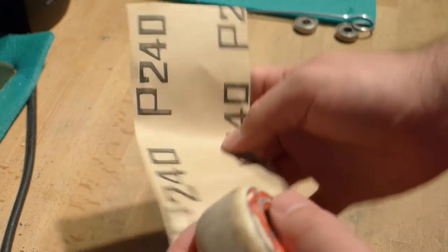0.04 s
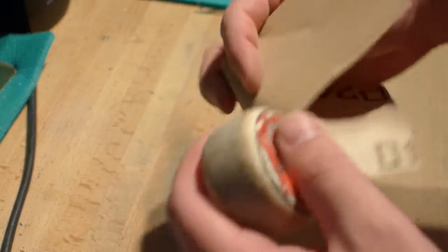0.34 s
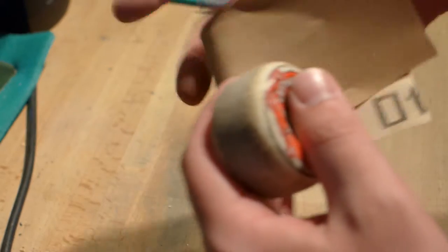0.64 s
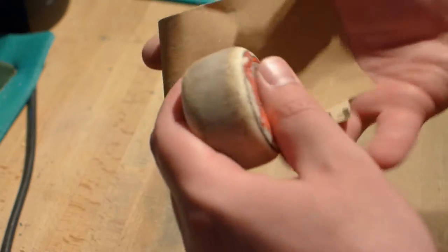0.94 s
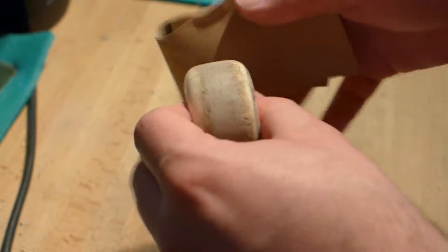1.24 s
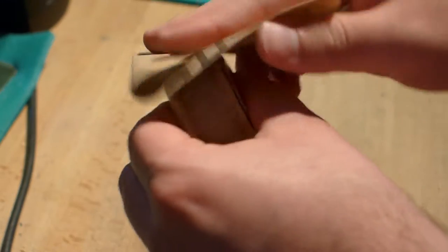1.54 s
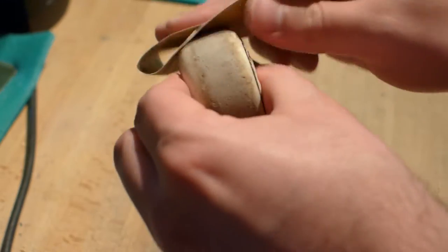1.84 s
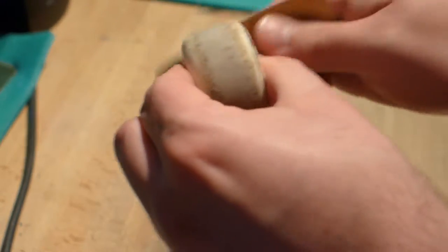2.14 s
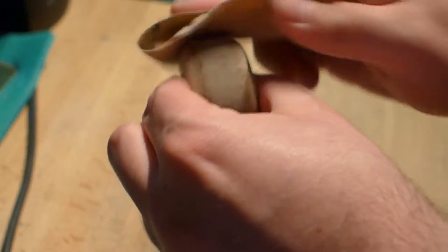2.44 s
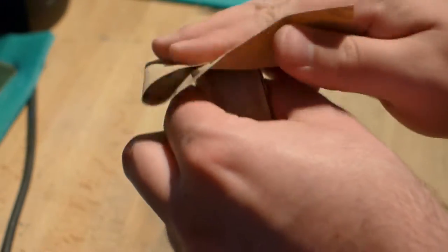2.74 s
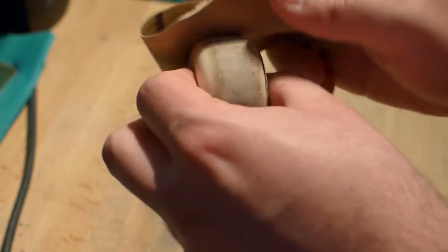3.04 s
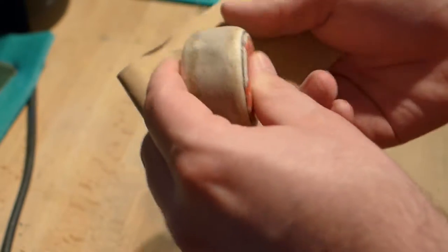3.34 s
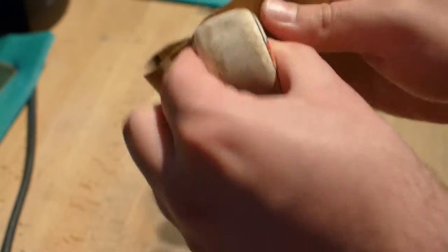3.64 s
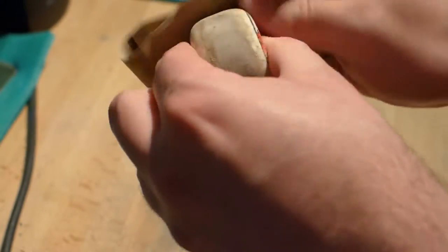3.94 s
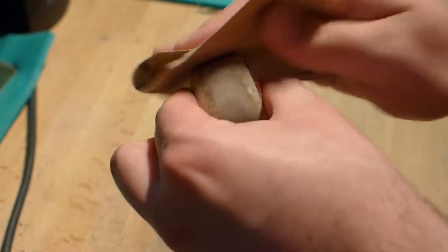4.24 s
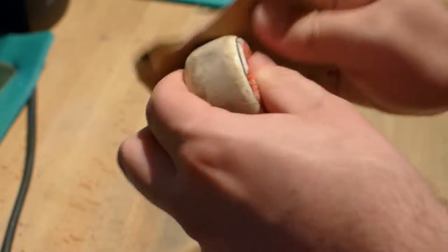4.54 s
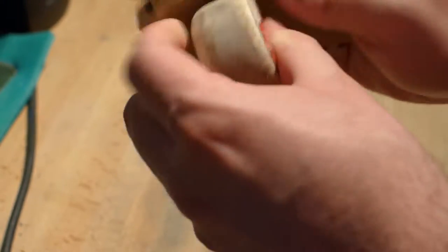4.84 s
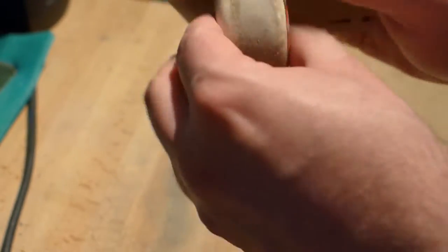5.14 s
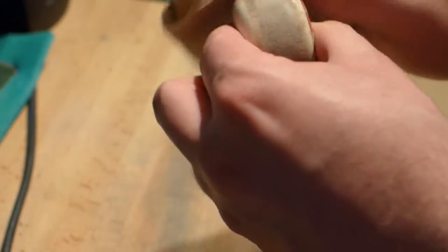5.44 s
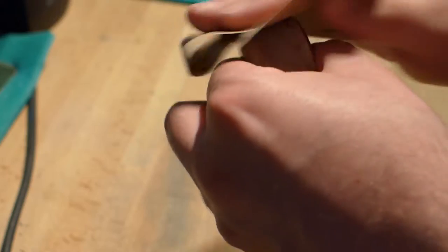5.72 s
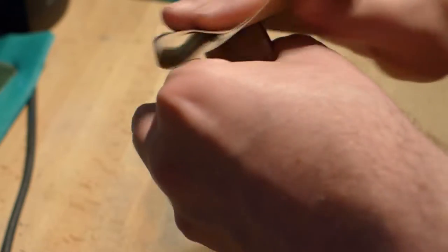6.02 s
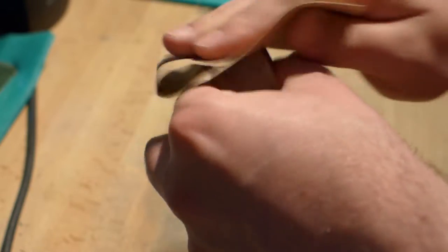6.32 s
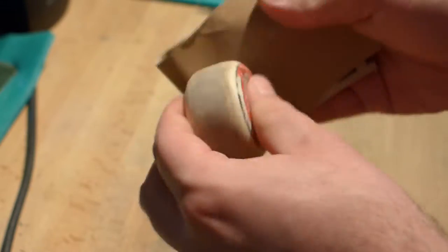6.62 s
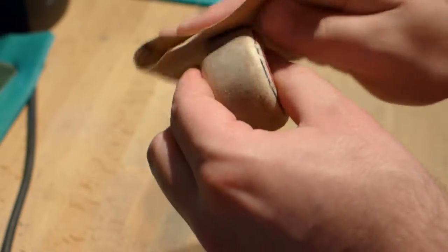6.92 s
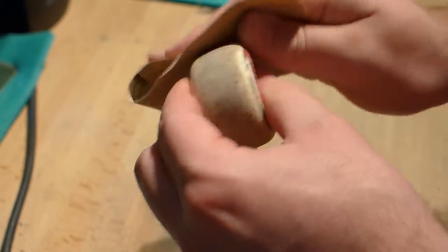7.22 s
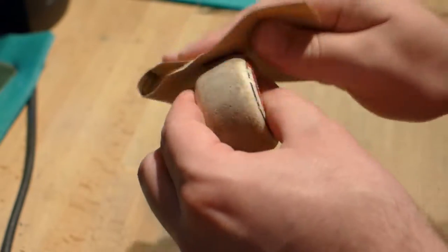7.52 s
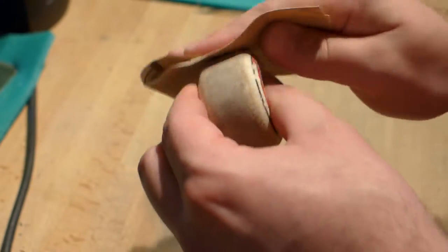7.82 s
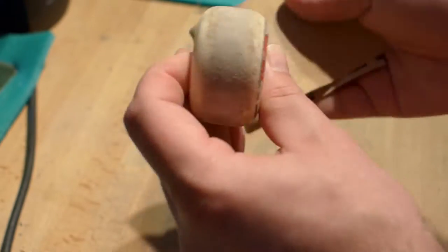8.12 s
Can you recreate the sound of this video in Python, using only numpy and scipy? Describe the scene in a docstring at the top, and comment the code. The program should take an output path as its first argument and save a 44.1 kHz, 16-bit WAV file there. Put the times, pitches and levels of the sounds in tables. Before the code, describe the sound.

A sheet of sandpaper rustles and cracks as fingers fold it. It then rasps against a skateboard wheel in separate, uneven strokes, with sharp little ticks of catching grit and a few soft finger bumps. The strokes speed up into fast, hissing back-and-forth scrubbing, break off briefly, then resume and stop. Everything is heard close up in a small, dry workshop.

```python
"""Sandpaper rubs a urethane skateboard wheel: long strokes, then scrubbing at about twenty strokes a
second, with pauses to turn the wheel. The grit hisses and drives the resonances of the folded sheet.
The sheet is folded by hand first, rustling and buckling; later, grit catches and fingers bump the wheel.
Heard close, above a wooden bench in a small, dry workshop."""
import sys
import numpy as np
from scipy import signal
from scipy.fft import rfft, irfft, next_fast_len
from scipy.io import wavfile
from scipy.ndimage import uniform_filter1d, map_coordinates

SR = 44100
rng = np.random.default_rng(int(sys.argv[2]) if len(sys.argv) > 2 else 0)


def transcribe(signal):
    """Save signal, clipped to [-1, 1], as a 16-bit WAV file at the path in sys.argv[1]."""
    frames = np.atleast_2d(signal).T
    limited = np.clip(frames, -1, 1)
    pcm = np.round(limited * 32767).astype(np.int16)
    wavfile.write(sys.argv[1], SR, pcm)


N = 364707

# Spectra of grit hiss, sheet ring and low body: (frequency [Hz], relative gain [dB])
GRIT_SPECTRUM = [(600, -59.5), (1300, -17), (2200, -5), (3500, -4.5), (5000, -0.5), (6000, -1.5), (7400, 1),
                 (9000, 0), (11500, 0), (13500, -2.5), (15500, -12)]
SHEET_SPECTRUM = [(500, -41), (1100, -36.5), (1400, -23), (1900, -11), (2300, -2.5), (3200, 2), (5000, 0),
                  (5900, -7), (9000, -27.5)]
BODY_SPECTRUM = [(50, -34), (130, -25.5), (230, -24.5), (320, -6), (450, -5.5), (640, 2), (800, -2),
                 (1100, 0), (1400, -0.5), (2200, -2), (4000, -25)]
# Modes of the fold, held slack and pressed tight: (centre [Hz], width [Hz], added peak [dB])
SLACK_FOLD_MODES = [(1515, 300, 8), (2190, 320, -1), (2800, 140, -9.5), (3960, 170, -3), (4760, 760, -4)]
TIGHT_FOLD_MODES = [(3010, 500, 0.67), (4120, 230, 0.72), (4820, 640, -0.75)]
# Steady low resonances of bench, room and cupped hand: (centre [Hz], width [Hz], added peak [dB])
LOW_RESONANCES = [(160.6, 20, 9.5), (450, 35, 3), (559, 37, -4), (883, 14, -7), (1336, 26, 4.5),
                  (1670, 230, 2)]
# Finger pressure on the fold: (time [s], tightness [0-1])
FOLD_GRIP = [(1.6, 0.01), (3.1, 0), (3.8, 0.7), (4.1, 0.97), (5.3, 0.97), (5.95, 1), (6.12, 0.05),
             (6.4, 0.9), (6.8, 0.2), (7.05, 0.97), (8.0, 1)]
SPEED_EXPONENT = 1.033  # amplitude ~ hand speed ** exponent


def sanding():
    """Sliding grit hisses and shakes the sheet; grip shifts the modes, stick-slip adds chatter."""
    resting_power = contact() ** 2 / 2
    hiss_power, ring_power = resting_power.copy(), resting_power.copy()
    body_power = resting_power * amp(-12) ** 2
    for start_s, length_s, db, crest, bright_db, body_db in strokes():
        power = (amp(db) * swell(length_s, crest) ** SPEED_EXPONENT) ** 2
        hiss_share = 1 / (1 + amp(-2 * bright_db))
        add(hiss_power, start_s, power * hiss_share)
        add(ring_power, start_s, power * (1 - hiss_share))
        add(body_power, start_s, power * amp(body_db) ** 2)
    chatter = amp(1.26 * wobble(rate_hz=170) - 0.97)
    grit = flexing(grains(clump_db=1.06, clump_hz=875, spike_db=2.5), depth_db=2.8)
    hiss = amp(-0.06) * coloured(np.sqrt(hiss_power) * grit, GRIT_SPECTRUM)
    scrape = lambda: flexing(grains(clump_db=2.3, clump_hz=699, spike_db=3.5), depth_db=4.0)
    grip = np.clip(curve(FOLD_GRIP), 0, 1)
    tight = coloured(np.sqrt(ring_power * grip) * scrape(), SHEET_SPECTRUM, TIGHT_FOLD_MODES)
    slack = coloured(np.sqrt(ring_power * (1 - grip)) * scrape(), SHEET_SPECTRUM, SLACK_FOLD_MODES)
    coarse = flexing(grains(clump_db=4.5, clump_hz=197.4, spike_db=4), depth_db=5.0)
    body = amp(3.5) * coloured(np.sqrt(body_power) * coarse, BODY_SPECTRUM, LOW_RESONANCES)
    return chatter * (hiss + amp(-0.84) * (tight + slack) + body)


# Single strokes: (start [s], length [s], relative level [dB], speed crest [0-1], brightness [dB],
# body send [dB])
SINGLE_STROKES = [(1.561, 0.095, -17, 0.4, -1, -18.5), (1.703, .1, -17, 0.29, 0.5, -23),
                  (1.81, 0.041, -25.5, 0.8, -2, -22), (1.855, 0.14, -20.5, 0, -1.5, -21),
                  (1.968, 0.08, -19, .55, 4, -24.5), (2.062, .078, -17, 0.36, 2.5, -21),
                  (2.193, .13, -17, .34, .5, -25.5), (2.351, 0.08, -20.5, 0.68, 8, -30.5),
                  (2.455, 0.14, -17.5, 0.06, 1.5, -25), (2.623, 0.085, -16.5, 0.24, 5.5, -27.5),
                  (2.728, 0.086, -18, 0.56, 3.5, -24), (2.831, 0.14, -19, 0.22, 8, -25.5),
                  (3.012, 0.12, -18, 0.61, -1, -28.5), (3.213, 0.15, -30, 0, 3.5, -17),
                  (3.506, 0.1, -22, 0.04, 7.5, -23.5), (3.587, 0.11, -23, 0.18, 4.5, -21.5),
                  (3.695, 0.12, -21, 0.38, 13, -25), (3.815, 0.081, -22, 0.05, 12, -25.5),
                  (3.89, 0.07, -17.5, 0.29, 4.5, -30), (3.959, 0.048, -19, .37, 10, -46),
                  (6.353, 0.074, -18.5, 0.4, -0.5, -27.5), (6.675, 0.08, -26, 0.27, 1.5, -44)]
# Back-and-forth runs: (start [s], end [s], strokes [count], relative level [dB], brightness [dB],
# body send [dB], push over pull [dB], build-up over the run [dB])
SCRUB_RUNS = [(4.012, 4.128, 2, -18.5, 2, -57, -3, -3), (4.13, 4.324, 4, -17.5, 1, -45, -2, 2),
              (4.33, 4.511, 4, -17.5, 2.5, -40, 2.5, 6), (4.516, 4.817, 6, -19.5, 2.5, -51, -1.5, 3.5),
              (4.832, 5.038, 4, -24.5, 3, -34, 1.5, -4.5), (5.035, 5.139, 2, -17.5, 2.5, -41, 0.5, 0.5),
              (5.147, 5.397, 4, -19.5, 3, -40, 0, 6), (5.399, 5.466, 1, -21.5, 2, -36, 0.5, -0.5),
              (5.468, 5.91, 9, -18.5, 1, -34.5, 0.5, 0), (5.912, 6.206, 6, -17.5, 2, -32, 2, 1),
              (6.214, 6.36, 3, -20.5, 1, -33.5, 3, -4), (6.75, 6.878, 3, -19.5, 1, -36, 1.5, -9),
              (6.887, 6.99, 2, -22.5, 2, -25, 0, -4), (6.991, 7.082, 2, -19, -1, -32, -1.5, 6.5),
              (7.088, 7.485, 8, -17.5, 0, -35.5, 1, -0.5), (7.495, 7.775, 6, -18, -1.5, -35.5, 1.5, -1.5),
              (7.782, 7.935, 3, -17, -1, -30.5, -0.5, 1.5), (7.93, 8.014, 2, -17.5, 3.5, -28.5, -8, -10.5)]
SCRUB_CREST, SCRUB_OVERLAP_S, SCRUB_SCATTER_DB = 0.42, 0.0043, 0.47
DULLING_DB_PER_DB = 0.28


def strokes():
    """All hand strokes; in a run, push and pull alternate and harder strokes are louder and duller."""
    rows = list(SINGLE_STROKES)
    for start_s, end_s, count, db, bright_db, body_db, push_db, build_db in SCRUB_RUNS:
        count = round(count)
        length_s = (end_s - start_s) / count
        for k in range(count):
            progress = (k + .5) / count - .5
            press_db = (-1) ** k * push_db / 2 + progress * build_db
            press_db += SCRUB_SCATTER_DB * rng.standard_normal()
            onset_s = start_s + k * length_s - SCRUB_OVERLAP_S / 2
            rows.append((onset_s, length_s + SCRUB_OVERLAP_S, db + press_db,
                         SCRUB_CREST, bright_db - DULLING_DB_PER_DB * press_db, body_db))
    return rows


# Paper lying lightly on the wheel: (landing [s], lift [s], relative level [dB])
LIGHT_CONTACTS = [(1.557, 3.127, -35), (3.145, 3.41, -40.5), (3.436, 6.471, -40.5), (6.661, 8.028, -39.5)]
LIFT_DB_PER_S = 595


def contact():
    """Gain of the light rubbing between strokes: starts on landing, holds, fades as the paper lifts."""
    t = np.arange(N) / SR
    gains = [(t >= land_s) * amp(db - LIFT_DB_PER_S * np.clip(t - lift_s, 0, 1))
             for land_s, lift_s, db in LIGHT_CONTACTS]
    return np.max(gains, axis=0)


# Spectra of paper rustle and sliding skin: (frequency [Hz], relative gain [dB])
RUSTLE_SPECTRUM = [(800, -32.5), (1400, -7), (1800, 0), (2100, 5), (2400, 4.5), (2900, 3.5), (3700, 1.5),
                   (5000, -5), (6500, -44), (12000, -51.5)]
SLIDE_SPECTRUM = [(2500, -38.5), (5000, -3), (7000, -3), (10000, -4), (13000, -7.5), (15500, -19.5)]
# Whisper of the loose sheet in the hand: (time [s], relative level [dB])
WHISPER_LEVELS = [(0, -46.5), (.3, -51), (.45, -47.5), (.76, -45), (.85, -54.5), (.92, -46), (1.55, -45.5),
                  (1.65, -78)]
# Finger rubs: (start [s], length [s], rustle [dB], flutter [dB], hiss [dB], flutter pitch [Hz])
FINGER_RUBS = [(0.026, 0.067, -38, -38, -35.5, 890), (0.094, 0.16, -44, -53, -38, 800),
               (0.188, 0.12, -45, -35.5, -61, 900), (0.356, 0.092, -44, -45, -44.5, 560),
               (0.627, 0.11, -26.5, -40, -31.5, 676), (0.875, .12, -36, -48.5, -47, 447),
               (0.978, 0.07, -37, -35, -32.5, 467), (1.077, 0.057, -36.5, -38, -34, 640),
               (1.103, 0.084, -24, -32, -30.5, 485), (1.17, 0.13, -40.5, -59.5, -42, 330),
               (1.285, 0.037, -36, -60, -33, 400), (1.332, 0.11, -31, -57.5, -30.5, 170),
               (1.489, 0.049, -32.5, -46.5, -33.5, 400), (3.202, 0.18, -48, -48.5, -48, 384),
               (3.506, 0.22, -55.5, -58.5, -48, 330)]
RUB_CREST, RUSTLE_HZ = 0.37, 2400


def folding():
    """Skin slides on the paper, which crackles and flutters at a pitch set by its bend."""
    crackle = lambda: flexing(grains(clump_db=2.5, clump_hz=398, spike_db=4.0), depth_db=4.0)
    slips, flutter, loose = crackle(), crackle(), crackle()
    whisper = coloured(loose, RUSTLE_SPECTRUM)
    whisper += amp(-5.0) * flapping(loose, pitch_hz=440)
    whisper += amp(-1.0) * coloured(loose, SLIDE_SPECTRUM)
    track = amp(curve(WHISPER_LEVELS)) * whisper
    for start_s, length_s, rustle_db, flutter_db, hiss_db, flutter_hz in FINGER_RUBS:
        speed = swell(length_s, RUB_CREST)
        first = max(round(start_s * SR), 0)
        drive = lambda source: speed * unit(source[first:first + len(speed)])
        rustle = coloured(drive(slips), RUSTLE_SPECTRUM, modes=[(RUSTLE_HZ, 300, 0.5)])
        add(track, start_s, amp(rustle_db) * rustle)
        add(track, start_s, amp(flutter_db) * flapping(drive(flutter), flutter_hz))
        add(track, start_s, amp(hiss_db) * coloured(drive(slips), SLIDE_SPECTRUM))
    return track


# Paper panel response: (frequency [multiple of pitch], relative gain [dB])
PANEL_SPECTRUM = [(.1, -36), (.3, -21), (.6, -7), (1, 5), (1.5, -3.5), (2.3, -3.5), (3, -10), (6, -42)]


def flapping(x, pitch_hz):
    """A panel of the sheet resonates around a pitch set by its free size."""
    return coloured(x, [(multiple * pitch_hz, db) for multiple, db in PANEL_SPECTRUM])


# Sheet buckles: (time [s], relative level [dB], flap send [dB], flap pitch [Hz])
SHEET_BUCKLES = [(0.215, -20.5, 1.5, 560), (0.235, -20.5, -1, 1020), (0.263, -21.5, -7, 670),
                 (0.372, -24, -3.5, 565), (0.404, -18.5, -6.5, 646), (0.668, -9, -16, 510),
                 (0.739, -24, -4.5, 390), (0.78, -23.5, -11, 345), (0.9193, -10, -7.5, 440),
                 (1.007, -25, -1, 442), (1.1086, -5, -14.5, 474), (1.1551, -10, -14.5, 360),
                 (1.4418, -8.5, -13.5, 423), (1.506, -18.5, -9.5, 400), (6.639, -13, -20.5, 565)]
# Grit catching and letting go; soft finger bumps on the wheel: (time [s], relative level [dB])
GRIT_CATCHES = [(1.3007, -7.5), (2.032, -2.5), (2.1824, -5.5), (2.3501, -2.5), (2.5636, -7), (2.582, -7),
                (3.06, -13), (3.093, -6), (3.1, -3), (3.166, -19), (3.190, -17), (3.263, -13),
                (3.4447, -15.5), (3.522, -18), (3.5684, -6), (7.0135, -4.5), (7.1415, -4)]
FINGER_BUMPS = [(1.349, -29.5), (2.462, -38), (3.515, -26), (3.573, -33.5), (5.408, -28), (6.628, -48),
                (6.639, -34)]
# Spectrum of cracks and ticks: (frequency [Hz], relative gain [dB])
CRACK_SPECTRUM = [(60, -49.5), (200, -28), (500, -18), (1000, -15), (2000, -4.5), (4200, 4), (6000, -0.5),
                  (8500, 1), (12000, -4.5), (15500, -20.5)]


def snaps():
    """Buckling paper cracks and flaps, caught grit ticks, fingers bump."""
    track = np.zeros(N)
    for time_s, db, flap_db, flap_hz in SHEET_BUCKLES:
        crack = amp(db) * burst(t60_s=.015, tail_db=-15, tail_t60_s=.1)
        add(track, time_s, amp(-6.0) * coloured(crack, RUSTLE_SPECTRUM))
        add(track, time_s, amp(-20.0) * coloured(crack, CRACK_SPECTRUM))
        flap = burst(t60_s=.022, tail_db=-18, tail_t60_s=.11)
        add(track, time_s, amp(db + flap_db + 1) * flapping(flap, flap_hz))
    for time_s, db in GRIT_CATCHES:
        tick = burst(t60_s=.008, tail_db=-17, tail_t60_s=.05)
        add(track, time_s, amp(db - 4) * coloured(tick, CRACK_SPECTRUM))
    for time_s, db in FINGER_BUMPS:
        bump = burst(t60_s=.026, tail_db=-22, tail_t60_s=.1)
        add(track, time_s, amp(db - 5.5) * flapping(bump, pitch_hz=385))
    return track


def burst(t60_s, tail_db, tail_t60_s):
    """A sudden release of tension, then a weaker shiver."""
    t = np.arange(SR // 8) / SR
    envelope = amp(-60 * t / t60_s) + amp(tail_db - 60 * t / tail_t60_s)
    noise = rng.standard_normal(len(t)) * envelope
    return noise / np.linalg.norm(noise) * np.sqrt(t60_s * SR / 20)


def swell(length_s, crest):
    """Hand speed from rest to rest, peaking at the fraction crest of the movement."""
    progress = np.linspace(0, 1, max(round(length_s * SR), 2))
    skewed = np.interp(progress, [0, np.clip(crest, .15, .9), 1], [0, .5, 1])
    return np.sin(np.pi * skewed)


def grains(clump_db, clump_hz, spike_db):
    """Dense tiny impacts of uneven size, arriving in clumps."""
    sizes = amp(spike_db * rng.standard_normal(N) + clump_db * wobble(clump_hz))
    return unit(rng.standard_normal(N) * sizes)


def flexing(x, depth_db, size=512):
    """Bending paper keeps shifting its many small resonances."""
    bins = signal.stft(x, nperseg=size)[2]
    ripple = uniform_filter1d(rng.standard_normal(bins.shape), size=3, axis=0)
    ripple = uniform_filter1d(ripple, size=9, axis=1)
    gain = amp(depth_db * np.clip(unit(ripple), -2, 2))
    return unit(signal.istft(bins * gain, nperseg=size)[1][:N])


TOP_HZ = 15950


def coloured(x, spectrum, modes=(), size=4096):
    """Minimum-phase filter of unit energy: a spectrum with resonance peaks on it."""
    hz = np.fft.rfftfreq(size, 1 / SR)
    gain = amp(along(spectrum, hz))
    for centre_hz, width_hz, db in modes:
        gain *= 1 + amp(db) / (1 + (2 * (hz - centre_hz) / width_hz) ** 2)
    gain *= np.where(hz < TOP_HZ + SR / 100, 1, 1 / 10)
    cepstrum = irfft(np.log(gain))
    cepstrum[1:size // 2] *= 2
    cepstrum[size // 2 + 1:] = 0
    response = irfft(np.exp(rfft(cepstrum)))
    return signal.oaconvolve(x, response / np.linalg.norm(response))[:N]


def amp(db):
    """Decibels to gain."""
    return 10 ** (np.asarray(db) / 20)


def unit(x):
    """Scale to rms 1."""
    return x / np.sqrt(np.mean(x ** 2) + 1e-20)


def along(points, hz):
    """Interpolate (frequency [Hz], value) points on a log axis."""
    knots_hz, values = np.transpose(points)
    return np.interp(np.log(hz + 1), np.log(knots_hz + 1), values)


def curve(points):
    """Interpolate (time [s], value) points at every sample."""
    times_s, values = np.transpose(points)
    return np.interp(np.arange(N) / SR, times_s, values)


def wobble(rate_hz):
    """Smooth random curve, rate_hz knots a second."""
    knots = rng.standard_normal(8192)
    return map_coordinates(knots, [np.arange(N) * rate_hz / SR], mode="mirror")


def add(track, time_s, sound):
    """Mix a sound into a track."""
    start = max(round(time_s * SR), 0)
    track[start:start + len(sound)] += sound[:max(N - start, 0)]


# Workshop decay: (frequency [Hz], T60 [s])
ROOM_T60 = [(200, 0.37), (1000, 0.2), (4000, 0.14), (14000, 0.11)]


def room(x):
    """Short diffuse reverberation that dies sooner in the treble."""
    hz, t, bins = signal.stft(rng.standard_normal(SR // 2), SR, nperseg=256)
    decay = amp(-60 * t / along(ROOM_T60, hz)[:, None])
    tail = signal.istft(bins * decay, SR, nperseg=256)[1]
    tail = np.pad(tail, (SR // 300, 0))  # pre-delay
    return signal.fftconvolve(x, tail / np.linalg.norm(tail))[:N]


# Spectra of side reverberation and mid and side background: (frequency [Hz], relative gain [dB])
ROOM_SIDE_SPECTRUM = [(100, -5), (250, -8), (550, 0), (2000, 0), (4000, 1), (9000, 3), (14000, 0)]
BACKGROUND_MID_SPECTRUM = [(25, -7.5), (70, -12), (160, -6.5), (300, -3), (450, -4.5), (600, -9),
                           (1000, -14.5), (3000, -20.5), (5000, -17), (10000, -23.5), (16000, -40.5)]
BACKGROUND_SIDE_SPECTRUM = [(25, -7), (100, -1), (400, -18.5), (2000, -8), (16000, -23)]


def scene():
    """Hands close and central; only the room and its steady background have width."""
    hands = sanding() + folding() + snaps()
    mid = hands + amp(-12.5) * room(hands)
    mid += amp(-64.5) * coloured(rng.standard_normal(N), BACKGROUND_MID_SPECTRUM)
    side = amp(-23.5) * coloured(room(hands), ROOM_SIDE_SPECTRUM)
    side += amp(-77.5) * coloured(rng.standard_normal(N), BACKGROUND_SIDE_SPECTRUM)
    return np.array([mid + side, mid - side])


def record(dry):
    """Low-pass at TOP_HZ with a 300 Hz raised-cosine edge."""
    size = next_fast_len(N + SR // 4)
    edge = np.clip((np.fft.rfftfreq(size, 1 / SR) - TOP_HZ) / 300, -.5, .5)
    gain = (1 - np.sin(np.pi * edge)) / 2
    return irfft(rfft(dry, size) * gain, size)[:, :N]


dry = scene()
out = record(dry)
transcribe(out)
```